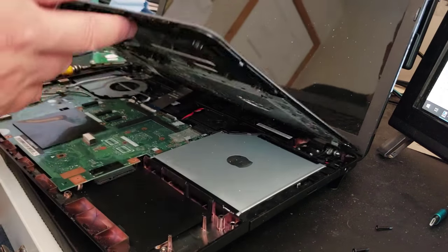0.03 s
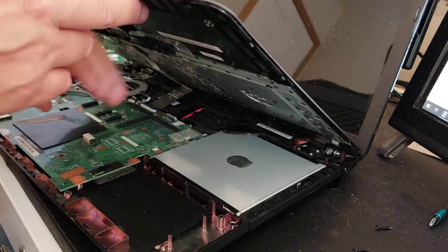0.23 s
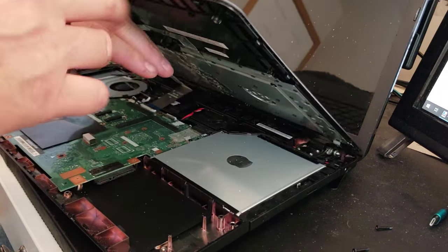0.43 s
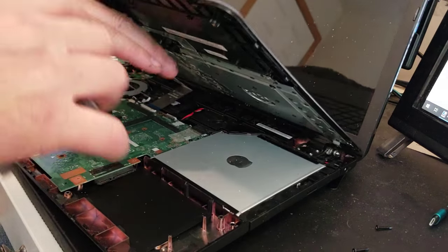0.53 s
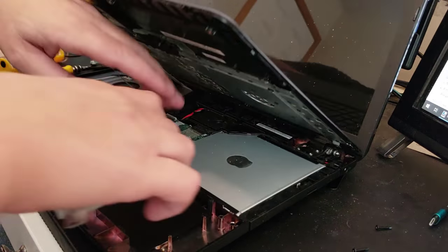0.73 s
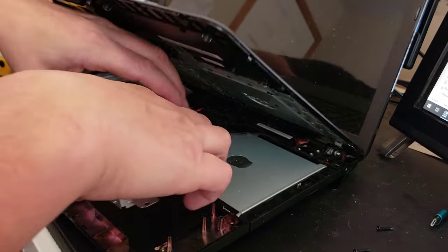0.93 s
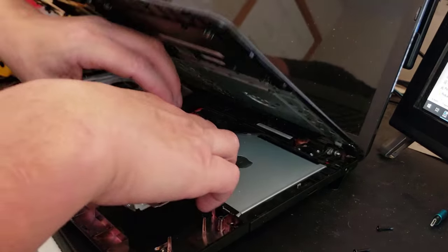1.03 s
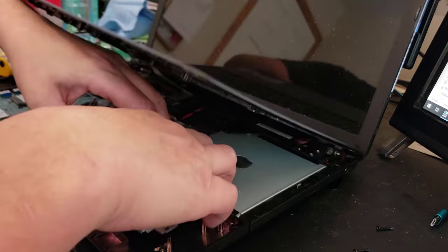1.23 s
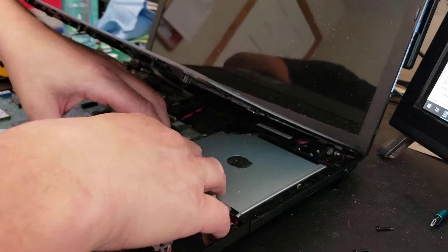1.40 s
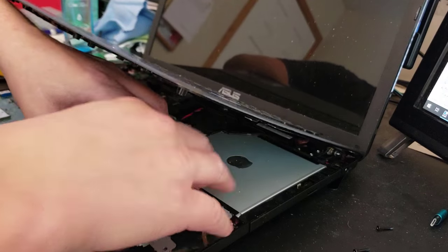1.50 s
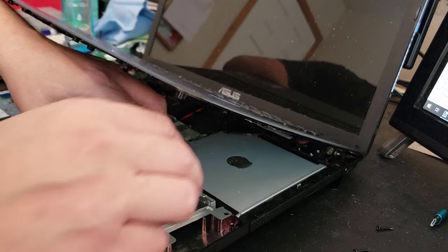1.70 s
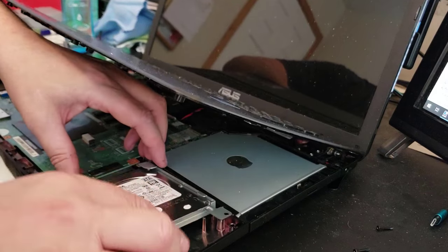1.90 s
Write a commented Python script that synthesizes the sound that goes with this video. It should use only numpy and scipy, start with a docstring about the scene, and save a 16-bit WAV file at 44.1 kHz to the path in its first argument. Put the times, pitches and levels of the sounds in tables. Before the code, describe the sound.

Hard-drive caddy knocks and rattles in a laptop bay after plastic clips snap and case knocks

```python
"""A hard-drive caddy knocks and rattles in its bay: damped noise bursts, decaying modes and chassis thumps.
Earlier, plastic clips tick and snap as the laptop's top case is lifted and knocks: coloured noise bursts,
the first snap with a metallic after-ring, the second with a hard modal tock. A hand slides in under
the case as grainy friction noise. The desk booms faintly as a low mode, a small room answers with
dense decaying noise echoes, and quiet room air is steady coloured noise."""
import sys
import numpy as np
from scipy import signal
from scipy.fft import rfft, irfft
from scipy.io import wavfile
from scipy.ndimage import uniform_filter1d

SR = 44100
rng = np.random.default_rng(int(sys.argv[2]) if len(sys.argv) > 2 else 0)


def dump(signal):
    """Clip the signal to [-1, 1] and save it as 16-bit WAV at the path in sys.argv[1]."""
    limited = np.clip(np.atleast_2d(signal).T, -1, 1)
    pcm = np.round(limited * 32767).astype(np.int16)
    wavfile.write(sys.argv[1], SR, pcm)


N = 85995

# Quiet room air, spectrum: (f/Hz, level/dB)
AIR_COLOUR = [(25, 15), (65, 14), (150, 3), (400, -14), (2000, -11), (8000, 15), (16000, -33)]
AIR_DB = -83.5

# Reverberation of the room: (f/Hz, T60/s)
ROOM_T60 = [(60, 0.27), (250, 0.37), (550, 0.32), (2000, 0.37), (5000, 0.36), (13000, 0.27)]
# Spectrum of the room echoes: (f/Hz, level/dB)
ROOM_COLOUR = [(60, 3), (250, -4.5), (520, 0), (1500, 0.5), (5000, 0.74), (13000, -3.5)]
# Build-up of the room echoes: (f/Hz, rise time/s)
ROOM_RISE = [(100, 0.043), (500, 0.0099), (2000, 0.0037), (10000, 0.0041)]
# Left-right correlation of diffuse sound: (f/Hz, correlation/0-1)
ROOM_SAME = [(150, 0.92), (300, 0.97), (600, 0.5), (1100, 0), (10000, 0.2)]
# Left-right correlation of direct sound: (f/Hz, correlation/0-1)
DIRECT_SAME = [(200, 1), (800, 0.54), (6000, 0.037)]

# Desk booms: (t/s, relative level/dB)
BOOMS = [(0.061, -47), (0.421, -41.5), (0.869, -37), (1.66, -44)]
# Mode of the desk, nominal: (f/Hz, level/dB, T60/s)
DESK_MODES = [(64.8, 0, 0.58)]
DESK_RISE_S = 0.013

# The case shifting in the hands, a low rustle: (t/s, level/dB)
RUSTLE = [(0, -54), (.1, -55), (.19, -76), (.5, -50.5), (.62, -61.5), (.7, -59.5), (1.1, -64),
          (1.45, -55.5), (1.8, -62.5), (1.95, -64)]
# Spectrum of the rustle: (f/Hz, level/dB)
RUSTLE_COLOUR = [(30, 11), (70, 6), (200, 0), (400, -7.5), (580, -1), (900, -2), (2150, 1), (3000, -11),
                 (16000, -30)]
# Skin sliding on the case: (t/s, level/dB)
CASE_SLIDE = [(.56, -86), (.68, -60), (.78, -51), (.84, -59.5), (1.0, -60.5), (1.1, -95)]
# Skin sliding on the smoother metal: (t/s, level/dB)
METAL_SLIDE = [(.94, -92), (1.0, -64), (1.06, -55), (1.13, -54.5), (1.3, -61), (1.38, -56.5), (1.5, -73),
               (1.8, -90)]
# Spectrum of sliding skin: (f/Hz, level/dB)
SLIDE_COLOUR = [(1000, -6.5), (2400, -6.5), (3700, 7.5), (5500, 2), (7500, 2), (9200, -4.5), (11500, 1.5),
                (16000, -4)]
METAL_TILT_DB = 3.5  # treble tilt, dB per octave
GRAIN_DB = 1  # standard deviation of the friction grain

# Faint dry ticks of the strained plastic: (t/s, relative level/dB)
TICKS = [(.182, -51), (0.197, -48.5), (0.219, -48)]
# Spectrum of a tick: (f/Hz, level/dB)
TICK_COLOUR = [(1000, -41), (2500, -16), (6000, 2)]
TICK_T60_S = 0.014
# Small squeaks of plastic on plastic: (t/s, relative level/dB, centre f/Hz)
SQUEAKS = [(1.901, -50, 2050)]
SQUEAK_T60_S = 0.11

# Plastic clips snapping: (t/s, relative level/dB, T60/s, echo level/dB)
SNAPS = [(0.2364, -26.5, 0.01, -6), (0.3601, -18.5, 0.028, 1.5)]
# Spectrum of each snap, one list per clip: (f/Hz, level/dB)
SNAP_COLOURS = [
    [(100, -35), (950, -22.5), (1500, -21), (2300, 5.5), (3000, -15.5), (4000, 10.5), (4900, -13),
     (5400, 4), (6400, -7), (7500, 3), (8100, 5), (8900, -12), (12000, -4.5), (16000, -15)],
    [(60, -27), (250, -13), (550, -4.5), (1000, -8.5), (2000, 0), (2650, 1.5), (3200, -8), (4300, 1.5),
     (7300, -3), (9200, -11), (10700, -3.5), (16000, -13)],
]
# Fuzzy metallic after-ring of the first clip, spectrum: (f/Hz, level/dB)
ZING_COLOUR = [(500, -34), (2100, -8), (3000, -19), (3700, -3.5), (4200, -9), (4800, -26), (5500, -18),
               (10000, -35)]
ZING_DB, ZING_T60_S = -34.5, 0.45
# Hard plastic tock of the second clip, nominal modes: (f/Hz, level/dB, T60/s)
TOCK_MODES = [(2058, 9.5, 0.027), (2156, 5.5, 0.019), (2748, -15, 0.13), (4260, -2, 0.03)]
TOCK_DB = -20.5

# Spectrum of the chassis thumping on the desk: (f/Hz, level/dB)
THUMP_COLOUR = [(25, -37), (70, -6), (130, -1), (240, 4), (330, -5.5), (500, -7.5), (900, -4.5),
                (4000, -67)]
THUMP_RISE_S, THUMP_T60_S, THUMP_DB = 0.013, 0.063, -5
# Spectrum of a contact on the top case: (f/Hz, level/dB)
CASE_COLOUR = [(60, -49), (500, -10), (780, -0.5), (2800, -2), (7000, -13), (9200, -23.5), (16000, -28)]
# Spectrum of a contact on the caddy: (f/Hz, level/dB)
CADDY_COLOUR = [(60, -41.5), (300, -11), (850, -3), (1700, -3), (7300, -10.5), (9200, -22), (11500, -16.5),
                (16000, -25.5)]
# Modes of the top case, nominal: (f/Hz, level/dB, T60/s)
CASE_MODES = [(553, -9.5, 0.36), (745.5, 8, 0.074), (1077, 3.5, 0.057), (1433, 4.5, 0.026),
              (2654, -2.5, 0.017)]
# Modes of the caddy, nominal: (f/Hz, level/dB, T60/s)
CADDY_MODES = [(269, 10.5, 0.19), (770, -10, .04), (820, -2.5, 0.062), (894, 2, .058), (1173, -6, 0.049),
               (1470, -7.5, 0.039), (1597, -5.5, 0.068), (1710, -2, 0.031), (2067, -11, 0.051),
               (3180, -8.5, 0.028)]
# Knocks of the plastic top case:
# (t/s, relative level/dB, treble tilt/dB per octave, relative thump level/dB, contact T60/s, favoured f/Hz)
CASE_KNOCKS = [(.026, -46, 2.5, 10, 0.033, 1380), (.060, -47.5, -3.5, 2, 0.006, 1400),
               (.0935, -49, -5, -11, .01, 2250), (.367, -36.5, -1, -3, .09, 750),
               (.406, -32, -13, 7.5, 0.029, 1120), (.4145, -30.5, 0.5, -14, 0.0016, 2600),
               (.663, -51, -3, -24, 0.089, 550), (.8274, -31, -1, -20, 0.039, 740),
               (.8335, -27.5, -4, -13, 0.0083, 760), (.837, -29, -4, -4, 0.009, 1100),
               (.8445, -30.5, 2.5, -4, .06, 750), (.851, -31, 5.5, 3.5, 0.033, 2680)]
# Knocks of the caddy in its bay:
# (t/s, relative level/dB, treble tilt/dB per octave, relative thump level/dB, contact T60/s, favoured f/Hz)
CADDY_KNOCKS = [(1.1422, -25.5, -2, -11.5, 0.027, 1670), (1.1448, -23.5, 2.5, -14, 0.032, 1500),
                (1.1728, -25, -13.5, -2.5, .02, 940), (1.196, -27, 0, 5, .05, 1300),
                (1.2075, -26.5, -2, 3.5, 0.02, 3070), (1.2155, -30, -20, 3, 0.0027, 1120),
                (1.2215, -29, 4, 2, 0.011, 260), (1.2255, -40, 7, -15, 0.032, 3100),
                (1.2325, -35, -2, -16.5, 0.035, 260), (1.241, -28, -2, -5, 0.084, 1640),
                (1.422, -40, -0.5, 0.5, 0.021, 850), (1.508, -39.5, 0.5, 0, 0.11, 846),
                (1.524, -30, -3, -6.5, 0.09, 1080), (1.535, -37, 0, -12, 0.086, 1600),
                (1.56, -30, 0.5, -1, 0.066, 990), (1.575, -30, 4, -1, 0.038, 1530),
                (1.6198, -20, -0.1, -9, 0.019, 844), (1.627, -27, 15, -1.5, 0.032, 1720),
                (1.634, -29.5, -2.5, -2, 0.026, 850)]
MODES_DB, KNOCK_ECHO_DB = -2.5, -1
SPOT_DB_PER_OCTAVE = 11  # modes far from the favoured one ring less
DETUNE = 0.0067  # standard deviation of the random share by which each mode is detuned at each strike

TILT_HZ = 1590  # corner above which a treble tilt takes hold
STRIKE_DB = 19.5  # gain of all struck sounds together
EDGE_HZ = 15900  # upper band limit


def amp(db):
    """Level law: decibels to amplitude gain."""
    return 10 ** (np.asarray(db) / 20)


def decay(t, t60):
    """Exponential damping: the level falls 60 dB in each T60."""
    return amp(-60 * t / t60)


def read(points, hz):
    """Logarithmic frequency scale: interpolates a table along it."""
    f, value = np.transpose(points)
    return np.interp(np.log(hz + 1), np.log(f + 1), value)


def unit(x):
    """Energy normalisation: scales the mean energy of the two channels to one."""
    return x / np.sqrt(np.sum(x ** 2) / 2 + 1e-20)


def add(mix, s, sound):
    """Superposition: mixes a stereo sound in at time s."""
    part = mix[:, max(round(s * SR), 0):][:, :sound.shape[1]]
    part += sound[:, :part.shape[1]]


def pair(same, size):
    """Coherence: stereo noise with a given left-right correlation at each frequency."""
    a, b = rfft(rng.standard_normal((2, size)))
    correlation = np.clip(read(same, np.fft.rfftfreq(size, 1 / SR)), -1, 1)
    turn = np.arccos(correlation) / 2
    common, opposed = a * np.cos(turn), b * np.sin(turn)
    return irfft(np.array([common + opposed, common - opposed]), size)


def colour(x, points, tilt_db=0, size=4096):
    """Minimum phase: a causal filter follows from the wanted spectrum and treble tilt."""
    hz = abs(np.fft.fftfreq(size, 1 / SR))
    octaves = np.log2(1 + (hz / TILT_HZ) ** 2) / 2
    log_gain = np.log(amp(read(points, hz) + tilt_db * octaves))
    # The Hilbert transform of the log gain gives the phase
    response = np.exp(np.conj(signal.hilbert(log_gain)))
    taps = np.fft.ifft(response).real[:size // 2]
    return signal.fftconvolve(x, taps[None], axes=1)[:, :x.shape[1]]


def flat(x, size):
    """Spectral whitening: divides a burst by its smoothed spectrum, size bins wide."""
    z = rfft(x)
    power = abs(uniform_filter1d(abs(z) ** 2, size, axis=1))
    return irfft(z / np.sqrt(power + 1e-12), x.shape[1])


def contact(t60, points, tilt_db=0):
    """High modal density: the quickly damped modes of a contact merge into decaying noise."""
    t = np.arange(SR // 3) / SR
    burst = pair(DIRECT_SAME, size=len(t)) * decay(t, max(t60, .002))
    first_half = t < t[-1] / 2
    return unit(colour(flat(burst, size=200) * first_half, points, tilt_db))


def ringing(body, t):
    """Modal superposition: damped sinusoids, slightly detuned and differently phased each time."""
    signs = rng.choice([-1, 1], len(body))
    phases = rng.normal(0, 0.53, (len(body), 2, 1))  # radians, one per mode and channel
    shifts = 1 + DETUNE * rng.standard_normal(len(body))
    total = np.zeros((2, len(t)))
    for (hz, db, t60), sign, phase, shift in zip(body, signs, phases, shifts):
        wave = np.sin(2 * np.pi * hz * shift * t + phase)
        total += sign * amp(db) * decay(t, t60) * wave
    return unit(total)


def air():
    """Stationary noise: quiet room air has a fixed spectrum and level."""
    return amp(AIR_DB) * np.sqrt(N) * unit(colour(pair(ROOM_SAME, size=N), AIR_COLOUR))


def room(x):
    """Diffuse reverberation: convolution with noise that builds up and decays by frequency."""
    hz, t, z = signal.stft(pair(ROOM_SAME, size=SR), SR, nperseg=128)
    rise = 1 - np.exp(-(t / read(ROOM_RISE, hz)[:, None]) ** 2)
    shape = rise * decay(t, read(ROOM_T60, hz)[:, None])
    tail = flat(signal.istft(z * shape, SR, nperseg=128)[1], size=200)
    tail = colour(tail, ROOM_COLOUR)[:, :SR * 3 // 4]
    return signal.fftconvolve(x, tail, axes=1)[:, :N]


def desk():
    """Resonance: a low desk mode swells and decays when the weight of the laptop shifts."""
    out, t = np.zeros((2, N)), np.arange(SR) / SR
    swell = 1 - np.exp(-t / DESK_RISE_S)
    for s, db in BOOMS:
        add(out, s, amp(db) * unit(ringing(DESK_MODES, t) * swell))
    return out


def rubbing(levels, points, tilt_db=0):
    """Friction: grainy noise whose level follows the movement of the hand."""
    grain = uniform_filter1d(rng.standard_normal(N), size=200)
    grain_gain = amp(GRAIN_DB * grain / grain.std())
    noise = colour(pair(ROOM_SAME, size=N) * grain_gain, points, tilt_db)
    movement = amp(np.interp(np.arange(N) / SR, *np.transpose(levels)))
    return unit(noise) * np.sqrt(N) * movement


def ticks():
    """Impulsive and narrow-band excitation: strained plastic ticks, then squeaks as the hand settles."""
    out = np.zeros((2, N))
    for s, db in TICKS:
        add(out, s, amp(db) * contact(TICK_T60_S, TICK_COLOUR))
    for s, db, hz in SQUEAKS:
        peak = [(hz / 2, -35), (hz, 0), (hz * 2, -45)]
        add(out, s, amp(db) * contact(SQUEAK_T60_S, peak))
    return out


def clips():
    """Sudden release: two clips snap and excite a noisy zing, then a modal tock."""
    out, t = np.zeros((2, N)), np.arange(SR) / SR
    zing_noise = pair(ROOM_SAME, size=SR) * decay(t, ZING_T60_S)
    zing = amp(ZING_DB) * unit(colour(zing_noise, ZING_COLOUR))
    tock = amp(TOCK_DB) * ringing(TOCK_MODES, t)
    for (s, db, t60, echo_db), points, after in zip(SNAPS, SNAP_COLOURS, (zing, tock)):
        snap = np.zeros((2, N))
        add(snap, s, amp(db) * contact(t60, points))
        out += snap + amp(echo_db) * room(snap)
        add(out, s, after)
    return out


def thump():
    """Heavily damped low resonance: the chassis meets the desk in a slowly rising noise burst."""
    t = np.arange(SR // 3) / SR
    swell = (1 - np.exp(-(t / THUMP_RISE_S) ** 2)) * decay(t, THUMP_T60_S)
    burst = pair(DIRECT_SAME, size=len(t)) * swell
    return unit(colour(flat(burst, size=40), THUMP_COLOUR))


def knocks(rows, body, points):
    """Impact: a contact burst, the modes favoured by its spot and a slower chassis thump."""
    out, t = np.zeros((2, N)), np.arange(SR // 3) / SR
    for s, db, tilt_db, thump_db, contact_t60, spot_hz in rows:
        modes = []
        for hz, level, t60 in body:
            distance = abs(np.log2(hz / spot_hz))  # octaves
            modes.append((hz, level - SPOT_DB_PER_OCTAVE * distance, t60))
        knock = contact(contact_t60, points, tilt_db)
        knock = knock + amp(MODES_DB) * ringing(modes, t)
        knock = knock + amp(THUMP_DB + thump_db) * thump()
        add(out, s, amp(db) * knock)
    return out


def scene():
    """Superposition: struck sounds with echoes, over hand friction and room air."""
    hands = rubbing(RUSTLE, RUSTLE_COLOUR) + rubbing(CASE_SLIDE, SLIDE_COLOUR)
    hands += rubbing(METAL_SLIDE, SLIDE_COLOUR, METAL_TILT_DB)
    knock = knocks(CASE_KNOCKS, CASE_MODES, CASE_COLOUR)
    knock += knocks(CADDY_KNOCKS, CADDY_MODES, CADDY_COLOUR)
    hits = desk() + ticks() + clips() + knock + amp(KNOCK_ECHO_DB) * room(knock)
    return air() + hands + amp(STRIKE_DB) * hits


def record(dry):
    """Band limitation: the recorder passes only frequencies below its upper edge."""
    taps = signal.firwin(255, EDGE_HZ, window=("kaiser", 9), fs=SR)
    return signal.oaconvolve(dry, taps[None], "same")


dry = scene()
out = record(dry)
dump(out)
```